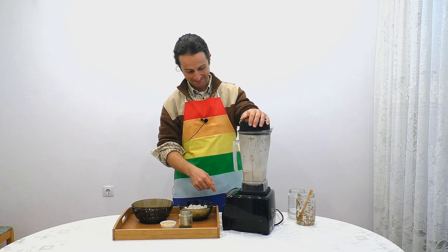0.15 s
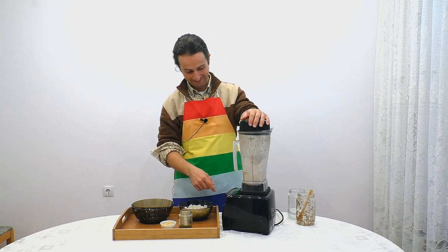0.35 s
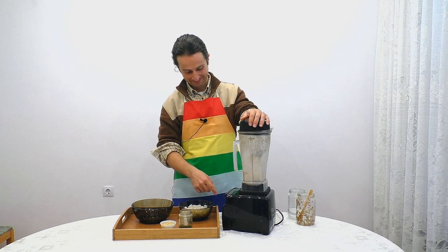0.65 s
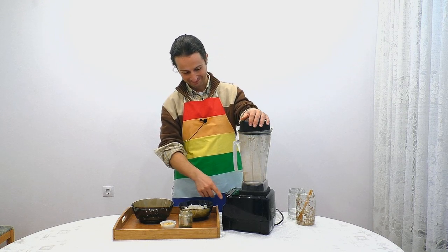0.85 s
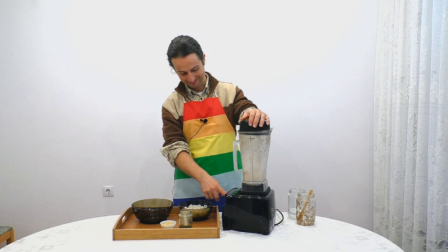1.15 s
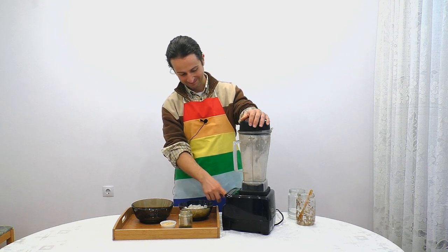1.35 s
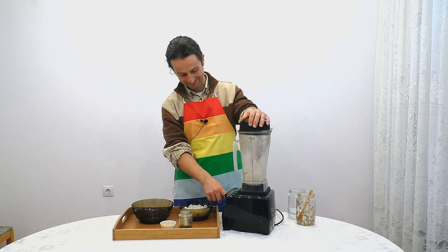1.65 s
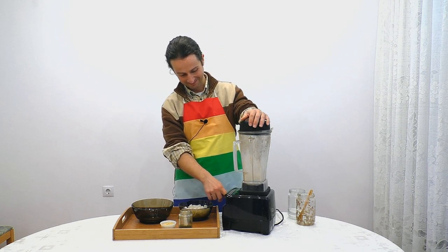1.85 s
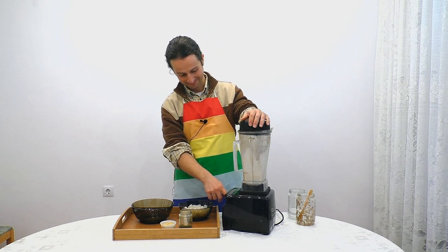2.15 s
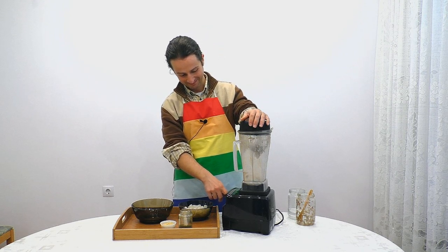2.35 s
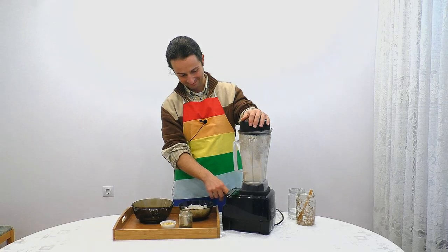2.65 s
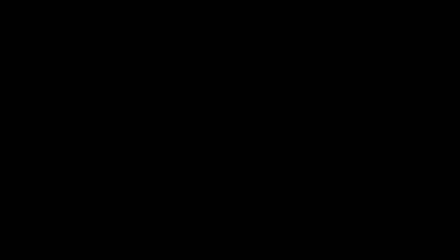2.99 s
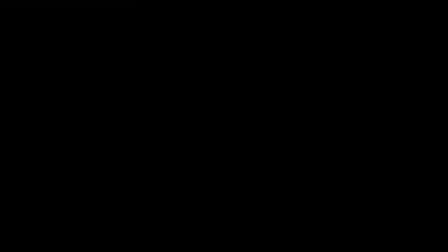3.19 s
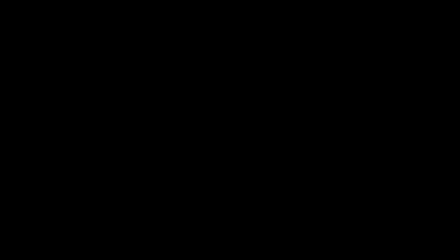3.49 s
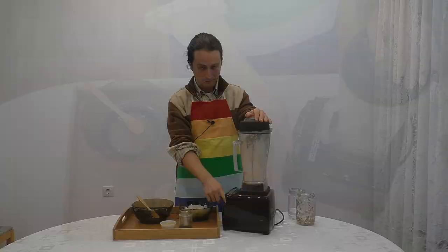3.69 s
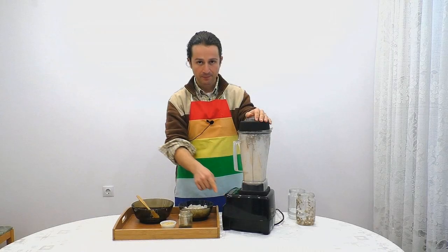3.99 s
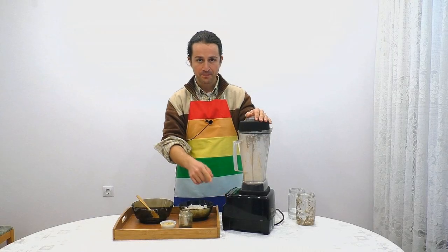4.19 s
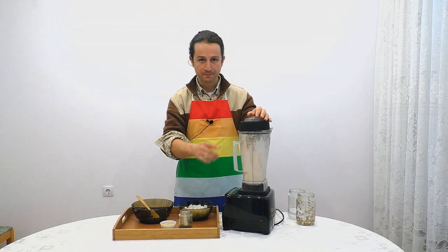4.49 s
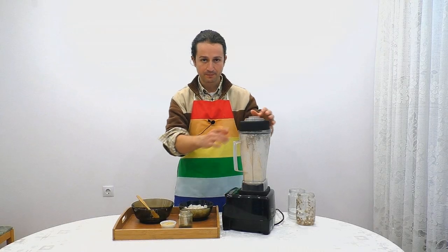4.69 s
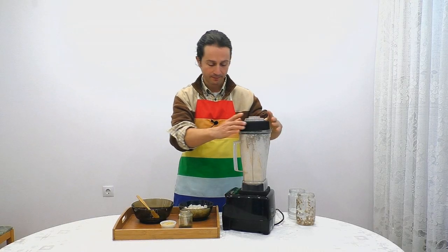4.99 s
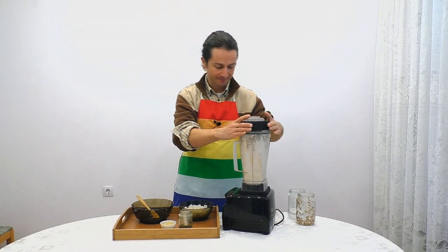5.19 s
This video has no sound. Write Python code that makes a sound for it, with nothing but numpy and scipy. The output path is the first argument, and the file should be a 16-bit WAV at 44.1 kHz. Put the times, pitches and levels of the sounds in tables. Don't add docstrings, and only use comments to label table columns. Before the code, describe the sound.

A kitchen blender roars through seeds and water in surging pulses, fades out and back in, then winds down into a quiet room.

```python
import sys
import numpy as np
from scipy import signal
from scipy.fft import rfft, irfft, next_fast_len
from scipy.io import wavfile
from scipy.ndimage import uniform_filter1d

SR = 44100
rng = np.random.default_rng(int(sys.argv[2]) if len(sys.argv) > 2 else 0)


def generate_wav(signal):
    frames = np.transpose(np.atleast_2d(signal))
    scaled = np.clip(frames, -1, 1) * 32767
    pcm = np.round(scaled).astype(np.int16)
    wavfile.write(sys.argv[1], SR, pcm)


def voltage_ratio(decibels):
    exponent = np.asarray(decibels, float) / 20
    return 10 ** exponent


N = 235579
T_S = np.arange(N) / SR
SWITCH_S, CUT_S = 3.5, 4.982
FREE_S = 3.6
LATE = T_S > FREE_S


def rms_one(x):
    return x / np.sqrt(np.mean(x ** 2) + 1e-20)


def drift(rate_hz):
    r = np.exp(-40 * np.pi * rate_hz / SR)
    white = rng.standard_normal(N // 20 + 2002)
    slow = signal.lfilter([1], [1, -2 * r, r * r], white)[2000:]
    return np.interp(np.arange(N) / 20, np.arange(len(slow)), rms_one(slow))


def resonance(x, hz, width_hz):
    r = np.exp(-np.pi * width_hz / SR)
    poles = [1, -2 * r * np.cos(2 * np.pi * hz / SR), r * r]
    return signal.lfilter([(1 - r * r) / 2, 0, (r * r - 1) / 2], poles, x + 1e-18)


def ring(start_s, peak_db, hz, t60_s):
    t = np.maximum(T_S - start_s, 0)
    return voltage_ratio(peak_db - 60 * t / t60_s) * np.sin(2 * np.pi * hz * t)


def grains(per_s, spread_db, decay_s, share):
    struck = rng.random(N) < per_s / SR
    sizes = voltage_ratio(spread_db * np.minimum(rng.exponential(1, N), 4)) * struck
    hits = rms_one(signal.lfilter([1], [1, -np.exp(-1 / (decay_s * SR))], sizes))
    return 1 - share + share * hits


def banded_noise(spectrum, envelope, patchy_db):
    size = next_fast_len(N)
    hz = np.maximum(np.arange(size // 2 + 1) * SR / size, 1)
    points = np.array(spectrum)
    low_hz, high_hz = points[0, 0], points[-1, 0]
    colour = voltage_ratio(np.interp(np.log(hz), np.log(points[:, 0]), points[:, 1]))
    outside_oct = np.maximum(np.log2(hz / high_hz), 0) + np.maximum(np.log2(low_hz / hz), 0)
    colour *= voltage_ratio(-40 * outside_oct)
    tinted = rfft(rng.standard_normal(N) * envelope, size) * colour
    out = 0
    for step in np.arange(np.floor(2 * np.log2(low_hz)) - 1, 2 * np.log2(high_hz) + 1):
        band = np.clip(1 - abs(2 * np.log2(hz) - step), 0, 1)
        out = out + irfft(tinted * band, size)[:N] * voltage_ratio(patchy_db * drift(12))
    return rms_one(out)


def orders(table, speed, turns, wobble_db, wobble_hz, rough_rad):
    out = 0
    for multiple, db in table:
        phase = 2 * np.pi * round(multiple) * turns + rough_rad * drift(wobble_hz) + rng.uniform(0, 2 * np.pi)
        level = voltage_ratio(db + wobble_db * drift(wobble_hz))
        out = out + level * np.sin(phase) * (multiple * speed < .4 * SR)
    return np.sqrt(2) * out


def room(x):
    t60_s, tail_db = .3, -7
    t = np.arange(SR // 2) / SR
    tail = rng.standard_normal(len(t)) * voltage_ratio(-60 * t / t60_s) * (t > .004)
    return x + voltage_ratio(tail_db) * signal.fftconvolve(x, tail / np.sqrt(np.sum(tail ** 2)))[:N]


# [t/s, speed/(turns/s)]
SURGE_SPEEDS = [(-.024, 190.4, .097, 178.5), (.269, 194.3, .434, 175.5), (.586, 195.6, .743, 175.0),
                (.914, 195.3, 1.069, 174.7), (1.253, 196.8, 1.395, 171.6), (1.599, 197.5, 1.787, 175.9),
                (1.962, 195.3, 2.096, 172.6), (2.297, 198.0, 2.448, 174.4), (2.636, 198.2, 2.813, 177.5),
                (2.976, 195.6, 3.158, 179.4)]
# [t/s, speed/(turns/s)]
LAST_SPEEDS = [
    (3.6, 196.4),
    (3.72, 194.2),
    (3.81, 196.6),
    (3.88, 200.0),
    (3.91, 200.4),
]
# bearing friction, share by speed [1/s], share by speed squared [1/turn]
BRAKING_LOSS = (128.05, .2316, .0047)


def rotor():
    s, speed = np.reshape(SURGE_SPEEDS, (-1, 2)).T
    knots = np.arange(len(s))
    place = np.interp(T_S, s, knots)
    eased = place // 1 + (1 - np.cos(np.pi * (place % 1))) / 2
    loaded = np.interp(eased, knots, speed)
    rows, step_s = list(LAST_SPEEDS), 220 / SR
    while rows[-1][1] > 0:
        s, v = rows[-1]
        rows.append((s + step_s, v - step_s * np.polyval(BRAKING_LOSS[::-1], v)))
    free = np.maximum(np.interp(T_S, *np.transpose(rows)), 0)
    free = np.abs(uniform_filter1d(free, size=500))
    speed = np.where(T_S < FREE_S, loaded, free)
    return speed, np.cumsum(speed) / SR


# [t/s, bite/dB, build-up/s, let-go/s]
BLADE_BITES = [(.02, 6.5, 0.11, 0.12), (.39, 5.5, 0.16, 0.075), (.69, 6.5, 0.11, 0.08),
               (1.015, 7, 0.1, 0.059), (1.34, 8.5, 0.072, 0.048), (1.53, 4, 0.013, 0.04),
               (1.71, 7, 0.073, 0.083), (2.04, 7.5, 0.1, 0.063), (2.39, 8, .09, 0.061),
               (2.6, 5.5, 0.079, 0.033), (2.73, 5.5, 0.084, 0.1), (3.081, 10.5, 0.09, .05),
               (3.89, 1, 0.025, .05)]
# [t/s, level/dB]
CHURNING = [
    (3.6, 5.5),
    (3.9, 1.5),
    (4.05, 0.9),
    (4.3, -.8),
    (4.4, -3.5),
    (4.63, -4),
    (4.8, -11),
    (4.96, -22),
]


def effort(speed):
    bites = [db * np.exp(-((T_S - s) / np.where(T_S < s, rise_s, fall_s)) ** 2)
             for s, db, rise_s, fall_s in BLADE_BITES]
    bite = np.max(bites, axis=0)
    churn = LATE * np.interp(T_S, *np.transpose(CHURNING))
    slow_db = LATE * 20 * np.log10((speed + 3.6) / 200)
    rock = np.exp(-((speed - 125) / 18) ** 2) + 11 * np.clip((170 - speed) / 40, 0, 1)
    crest = ~LATE * 0.045 * (np.interp(T_S - 0.1, T_S, speed) - 186)
    shake_db = -54.5 + bite + rock - 3 * LATE + .5 * churn + 0.2 * drift(2.7)
    grind_db = -33.5 + bite + churn
    splash_db = -48 + 1.09 * bite + LATE + slow_db
    air_db = -49 + 0.21 * bite + crest - 3.1 * LATE + 0.56 * slow_db + .8 * drift(8.9)
    return voltage_ratio(shake_db), voltage_ratio(grind_db), voltage_ratio(splash_db), voltage_ratio(air_db)


# [f/Hz, width/Hz, signed gain]
STANDING_WAVES = [(193.1, 1.7, 1.36), (189.5, 5.05, -1.58), (165.5, 12.4, -1.42), (125.6, 6.5, -4.75)]
# [multiple of speed, level/dB]
SHAFT_ORDERS = [(2, -6), (3, -8.5), (4, -10), (5, -12), (10, -18), (11, -38.5)]


def hum(speed, turns):
    lead = round(.648 * SR)
    longer = np.concatenate([speed[:lead], speed])
    push = (longer / 200) ** 2.24 * np.sin(2 * np.pi * np.cumsum(longer) / SR)
    first = push + sum(gain * resonance(push, hz, width_hz) for hz, width_hz, gain in STANDING_WAVES)
    upper = (speed / 200) ** 2 * orders(SHAFT_ORDERS, speed, turns, wobble_db=3, wobble_hz=18, rough_rad=1.2)
    upper = signal.sosfilt(signal.butter(8, 335, "high", fs=SR, output="sos"), upper)
    upper = .45 * upper + .75 * resonance(upper, hz=357, width_hz=28)
    race_db = 3 * np.clip((speed - 196) / 4, -1, 1) * (T_S < SWITCH_S + .06)
    dying_db = -3 * np.clip((120 - speed) / 25, 0, 1)
    return voltage_ratio(-28.9 + LATE * (2 + race_db + dying_db)) * (first[lead:] + upper)


# [multiple of speed, level/dB]
LIGHT_ORDERS = [(21, -5), (22, 2.5), (27, -2), (28, -1), (61, -3), (66, -6), (67, -7)]
# [multiple of speed, level/dB]
BAR_ORDERS = [(43, -13), (44, 2.5), (45, -13), (58, -13), (66, -4), (88, -3), (110, -3), (132, -4),
              (154, -5), (176, -6), (198, -8), (220, -9)]


def commutator_whine(speed, turns):
    light = orders(LIGHT_ORDERS, speed, turns, wobble_db=3, wobble_hz=30, rough_rad=.5)
    light = np.where(LATE, 1, voltage_ratio(-14)) * light
    bars = orders(BAR_ORDERS, speed, turns, wobble_db=2, wobble_hz=30, rough_rad=.35)
    coast_db = 1.5 * np.clip((198 - speed) / 15, 0, 1) * (T_S > SWITCH_S)
    return voltage_ratio(-3 + coast_db) * room(light + bars)


# [f/Hz, width/Hz, level/dB]
HOUSING_MODES = [(3500, 450, 0), (4350, 260, 2), (5200, 250, -2), (5600, 200, 0), (6500, 350, 3),
                 (7900, 300, -2), (8580, 320, 6), (9700, 250, 3), (10250, 250, 0), (11400, 250, -4),
                 (12200, 200, -3), (13000, 400, -1), (14400, 700, -7)]
# [f/Hz, level/(dB per Hz)]
AIR_SPECTRUM = [(4000, -1.5), (6000, 1), (7500, 2.5), (9000, -1.5), (11000, -1), (13000, -2), (14500, -4),
                (16000, -6.5)]


def motor(speed, turns, air):
    whine = commutator_whine(speed, turns)
    brush_db = 1 + 5 * np.clip((150 - speed) / 80, 0, 1)
    brushes = whine + voltage_ratio(brush_db) * rng.standard_normal(N)
    housed = voltage_ratio(-29) * whine
    for k, (hz, width_hz, db) in enumerate(HOUSING_MODES):
        housed = housed + (-1) ** k * voltage_ratio(db) * resonance(brushes, hz, width_hz)
    fan = banded_noise(AIR_SPECTRUM, grains(per_s=40, spread_db=4, decay_s=.004, share=.1), patchy_db=.4)
    topless = signal.sosfilt(signal.butter(2, 15000, "low", fs=SR, output="sos"), fan)
    bright = np.clip(speed / 170, 0, 1) ** 2
    moving = np.clip(speed / 37, 0, 1)
    dull = signal.sosfilt(signal.butter(1, 5100, "low", fs=SR, output="sos"), topless + housed)
    full = voltage_ratio(4.5) * (bright * fan + (1 - bright) * topless) + housed
    return air * (moving * full + (1 - moving) * voltage_ratio(-0.5) * dull)


# [f/Hz, level/(dB per Hz)]
GRIND_SPECTRUM = [(130, -18), (220, -7.5), (244, -10.5), (368, -9.5), (434, -9.5), (574, -4), (700, -11.5),
                  (806, -4.5), (1160, -10), (1810, -7), (2880, -26), (3600, -25), (4680, -50.5),
                  (7920, -120)]
# [f/Hz, level/(dB per Hz)]
SETTLING_SPECTRUM = [(88, -38), (150, -10), (251, -5.5), (277, -10.5), (464, -5.5), (512, -3.5),
                     (676, -12.5), (735, -9.5), (999, -12), (1790, -13), (3300, -23), (4200, -35.5),
                     (5460, -58), (9240, -120)]
# [f/Hz, level/(dB per Hz)]
SPLASH_SPECTRUM = [(1350, -30.5), (2300, -1), (2940, -5.5), (3850, -8.5), (6770, -10), (7450, -14),
                   (8200, -11.5), (10700, -35.5), (18000, -120)]
# [f/Hz, level/(dB per Hz)]
SHAKE_SPECTRUM = [(12, -60.5), (20, -24.5), (65, -17.5), (91, -9), (134, -7), (140, -6), (150, -6),
                  (200, -29.5), (330, -120)]
# [f/Hz, width/Hz, lift/dB]
JAR_MODES = [(109, 6.2, 2.5), (305, 16, 5), (430, 26, 4), (544, 200, 4), (796.6, 25, 5.5), (1446, 56, 4),
             (1771, 33, 2.5), (2120, 21, 9), (2210, 51, 3.5), (6980, 310, 5.5)]


def jar(speed, turns, shake, grind, splash):
    beat = voltage_ratio(1.2 * np.sin(2 * np.pi * turns) + .6 * np.sin(2 * np.pi * 100 * T_S))
    impacts = beat * grains(per_s=560, spread_db=6, decay_s=0.0058, share=0.18)
    fast = np.clip((speed - 90) / 80, 0, 1)
    body = np.sqrt(fast) * banded_noise(GRIND_SPECTRUM, impacts, patchy_db=0.65)
    body += np.sqrt(1 - fast) * banded_noise(SETTLING_SPECTRUM, impacts, patchy_db=1.5)
    drops = impacts * grains(per_s=30, spread_db=4, decay_s=.006, share=.18)
    spray = splash * banded_noise(SPLASH_SPECTRUM, drops, patchy_db=1.1)
    shaking = shake * banded_noise(SHAKE_SPECTRUM, 1, patchy_db=2)
    out = voltage_ratio(-2) * grind * body + voltage_ratio(0.4) * spray + voltage_ratio(-0.5) * shaking
    return out + sum((voltage_ratio(db) - 1) * resonance(out, hz, width_hz) for hz, width_hz, db in JAR_MODES)


# [t/s, peak/dB, f/Hz, width/Hz, decay/s]
FLUNG_SEEDS = [(1.33, -46, 3800, 1300, .012), (1.52, -36.5, 4560, 1300, 0.017),
               (2.132, -42, 14000, 4000, .006), (2.589, -40, 4520, 1500, 0.016),
               (2.836, -41.5, 14850, 1700, .01), (3.84, -35, 305, 14, 0.055), (4.135, -30, 507, 89, 0.017),
               (4.325, -29, 470, 78, 0.0077), (4.479, -35, 510, 140, 0.026), (4.771, -44, 490, 89, 0.014),
               (4.843, -55, 3070, 180, 0.0087)]


def flung_seeds():
    out = np.zeros(N)
    for s, db, hz, width_hz, decay_s in FLUNG_SEEDS:
        t = np.maximum(T_S - s, 0)
        swell = np.minimum(t * hz / 2, 1)
        burst = rms_one(resonance(rng.standard_normal(N), hz, width_hz))
        out += voltage_ratio(db) * burst * swell * np.exp(-t / decay_s)
    return out


def fader():
    dip_s = 0.0085
    out = np.clip((3.092 - T_S) / 0.13, 0, 1) ** 1.44
    back = np.clip((T_S - 3.644) / .25, 0, 1) ** .8
    running = out + back * np.clip((CUT_S - T_S) / dip_s, 0, 1)
    return running, np.clip((T_S - CUT_S) / dip_s, 0, 1)


# [f/Hz, level/dB, t60/s]
SWITCH_MODES = [(2680, 3, 0.1), (3530, 3, .05), (3990, -6, 0.5), (5200, -6, 0.22)]


def switch():
    return sum(ring(SWITCH_S, -50 + db, hz, t60_s) for hz, db, t60_s in SWITCH_MODES)


# [f/Hz, level/(dB per Hz)]
RUMBLE_SPECTRUM = [(7.1, -23), (12, -4.5), (70, -14.5), (112, -12), (182, -19), (250, -24), (320, -47),
                   (550, -120)]
# [f/Hz, level/(dB per Hz)]
RUSTLE_SPECTRUM = [(88, -34), (150, -7), (259, -3.5), (280, -7.5), (522, -5.5), (622, -10), (1330, -12.5),
                   (1820, -16), (6200, -21.5), (15800, -28)]
# [t/s, peak/dB, f/Hz, t60/s]
LID_TOUCHES = [(4.993, -40, 386, 0.058), (4.996, -41, 500, 0.11), (4.995, -45, 1500, .05),
               (4.992, -48, 200, 0.061), (5.01, -47, 1500, 0.026), (5.04, -56, 1400, 0.018),
               (5.209, -46, 850, 0.029), (5.2095, -47, 1690, 0.027), (5.21, -49, 2500, 0.016),
               (5.2105, -53, 3700, 0.015), (5.2092, -50, 1250, 0.02), (5.2098, -54, 5200, 0.01),
               (5.221, -44, 140, 0.054), (5.275, -59, 1120, 0.067)]


def quiet_room(opened):
    t = np.maximum(T_S - CUT_S, 0)
    rustle = voltage_ratio(-50.5 - 11.5 * t - 4 * np.exp(-t / 0.045))
    rubbing = grains(per_s=80, spread_db=3, decay_s=.004, share=.2)
    cloth = banded_noise(RUSTLE_SPECTRUM, rubbing, patchy_db=1.2)
    rumble = voltage_ratio(-52) * banded_noise(RUMBLE_SPECTRUM, 1, patchy_db=2)
    return opened * (rumble + rustle * cloth) + sum(ring(*row) for row in LID_TOUCHES)


def scene():
    speed, turns = rotor()
    shake, grind, splash, air = effort(speed)
    running, opened = fader()
    blender = hum(speed, turns) + motor(speed, turns, air)
    blender += jar(speed, turns, shake, grind, splash) + flung_seeds() + switch()
    return (running * blender + quiet_room(opened))[None]


def low_pass(x):
    return signal.sosfilt(signal.butter(12, 16000, fs=SR, output="sos"), x)


def record(dry):
    mix = signal.sosfilt(signal.ellip(10, .5, 45, 15750, fs=SR, output="sos"), dry)
    return low_pass(mix)


dry = scene()
out = record(dry)
generate_wav(out)
```